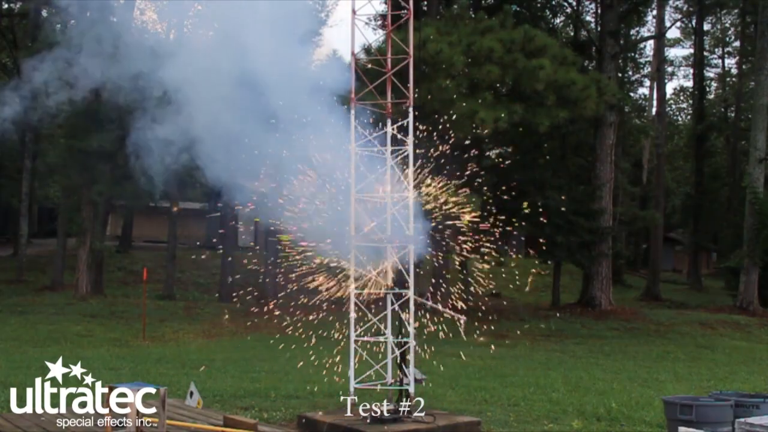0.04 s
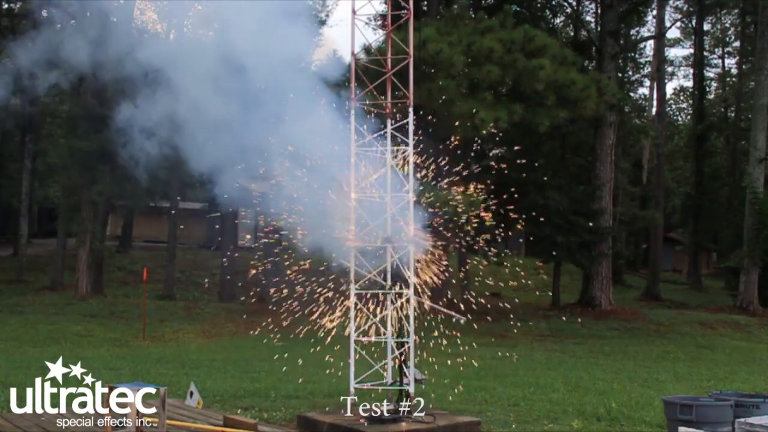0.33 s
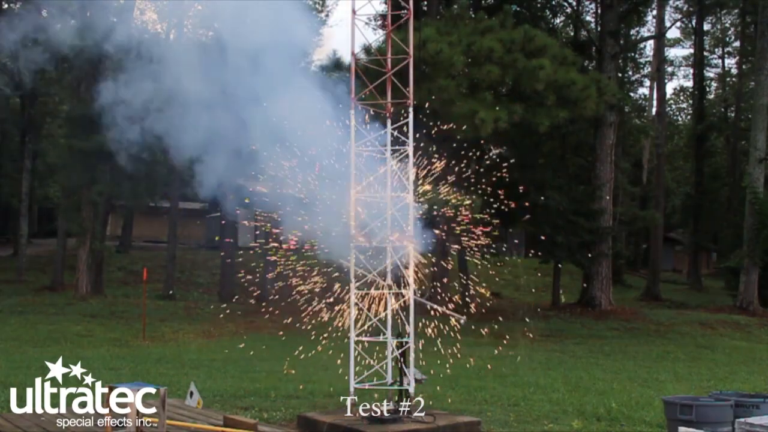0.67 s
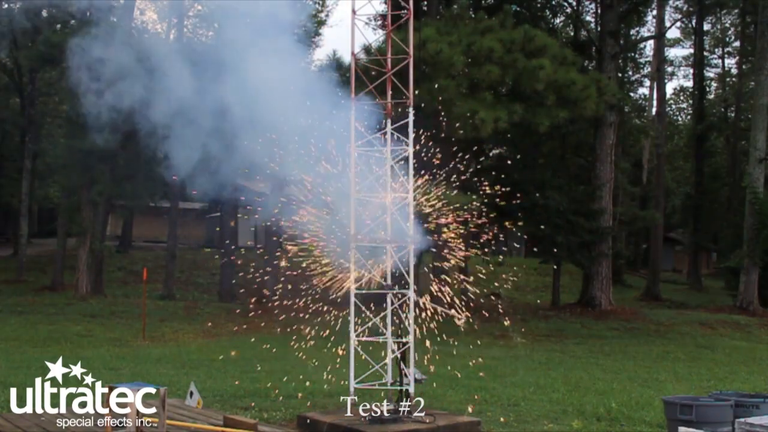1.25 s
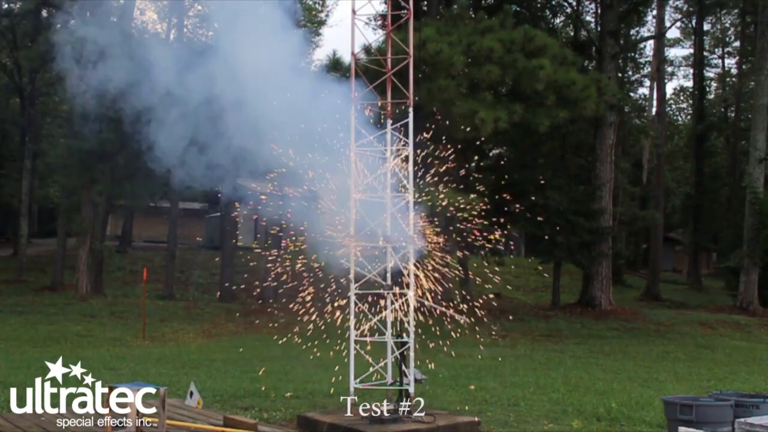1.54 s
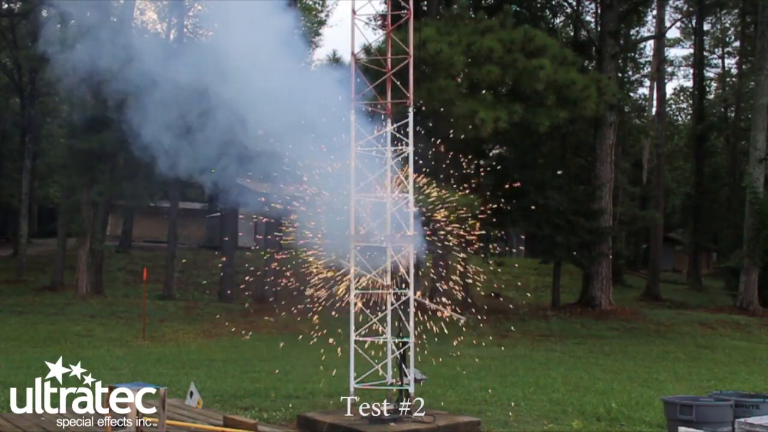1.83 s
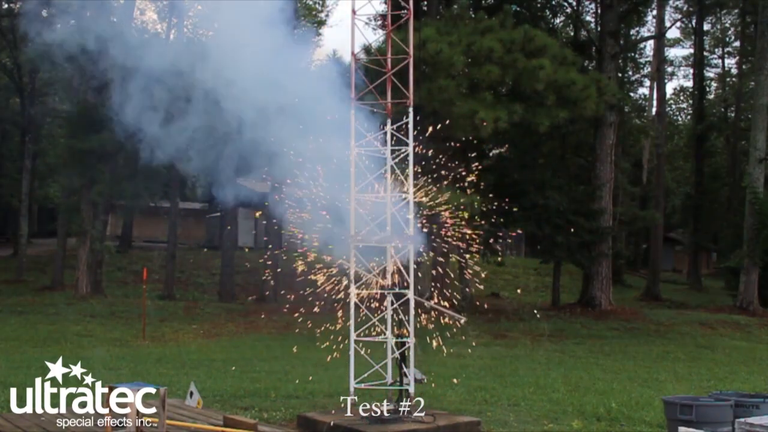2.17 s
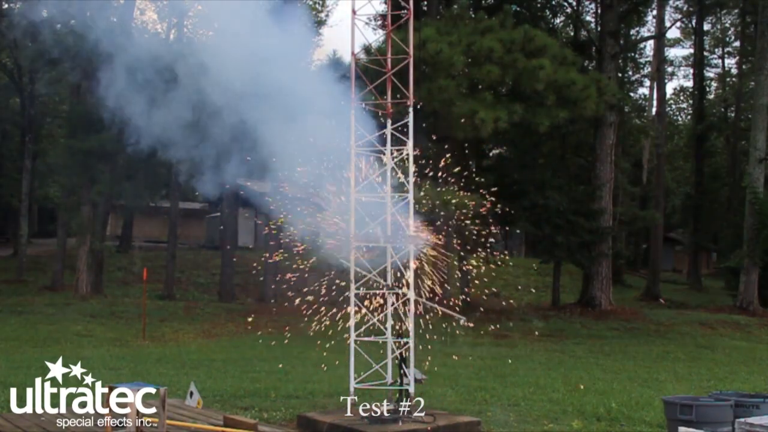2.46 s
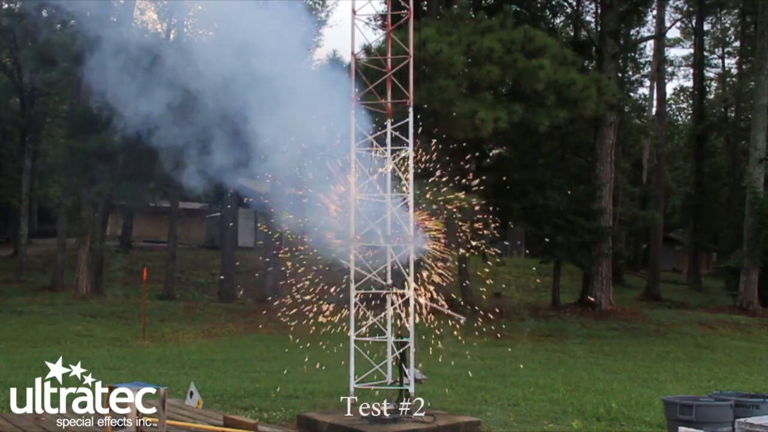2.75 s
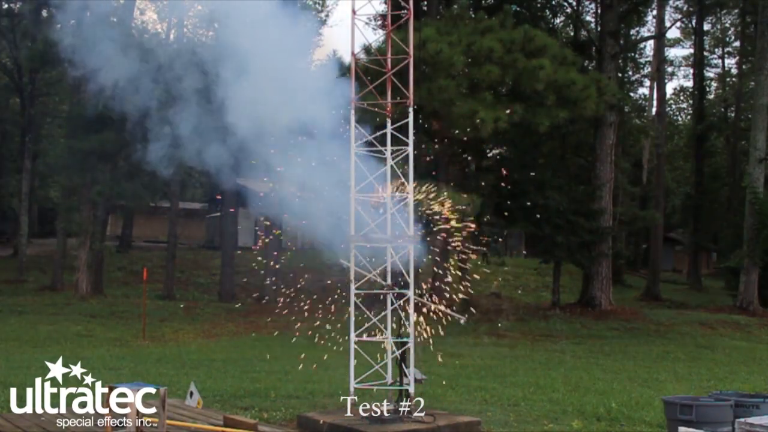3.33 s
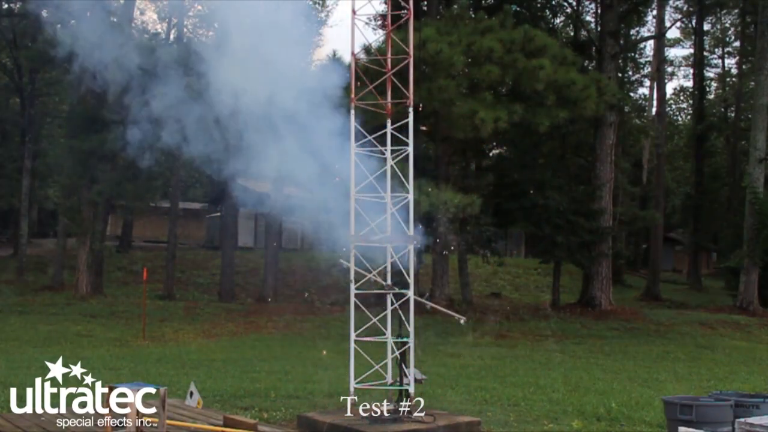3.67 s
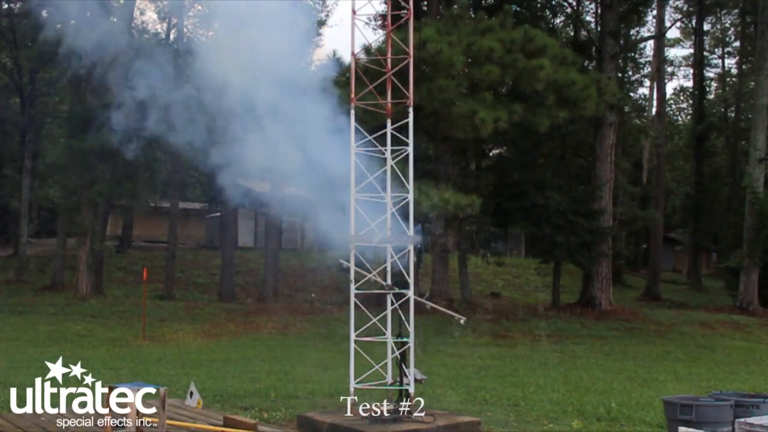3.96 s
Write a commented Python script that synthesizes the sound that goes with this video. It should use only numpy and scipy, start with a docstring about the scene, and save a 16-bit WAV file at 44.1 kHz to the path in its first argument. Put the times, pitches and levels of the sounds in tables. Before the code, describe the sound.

A firework wheel hisses loudly outdoors, fluttering and thick with crackling sparks and occasional sharp pops. Near the end the hiss drops away quickly, leaving a cluster of last pops and a faint, brief squeal.

```python
"""Firework wheel in a forest clearing

A wheel spins on a steel mast: its jets hiss and flutter, full of bursting sparks. Each pop comes
twice, direct and off the ground, and the trees scatter a faint tail. At 3.5 s the fuel runs out into
a few last pops. A thin squeal, probably the pivot, and a low hum like mains power are left."""
import sys
import numpy as np
from scipy import signal
from scipy.fft import rfft, irfft
from scipy.io import wavfile
from scipy.ndimage import map_coordinates

SR = 44100
rng = np.random.default_rng(int(sys.argv[2]) if len(sys.argv) > 2 else 0)


def master(y):
    """Save y as 16-bit WAV."""
    cut = np.clip(np.atleast_2d(y).T, -1, 1)
    pcm = np.round(cut * 32767)  # scale
    wavfile.write(sys.argv[1], SR, pcm.astype(np.int16))


N = 176400  # 4 seconds
T = np.arange(N) / SR

# How hard the jets push. Each row: time in seconds, level in dB.
THRUST = [(0.0, -18), (0.15, -19), (0.57, -21), (0.68, -18.5), (0.84, -20), (0.85, -18.5), (1.49, -20),
          (1.53, -17.5), (1.65, -21), (1.73, -18.5), (2.1, -20), (2.3, -19), (2.79, -21), (2.81, -18.5),
          (2.87, -20), (2.89, -17.5), (3.02, -21), (3.07, -18.5), (3.19, -19.5), (3.21, -21.5),
          (3.3, -19.5), (3.5, -23)]
# The push fading as the fuel runs out. Each row: time in seconds, level in dB.
DYING_THRUST = [(3.555, -28.5), (3.6, -35), (3.635, -36.5), (3.66, -31), (3.705, -41.5), (3.765, -41.5),
                (3.795, -51), (3.89, -49), (4.0, -52)]
# The tone of the jets. Each row: frequency in Hz, relative level in dB.
JET_TONE = [(35, -61), (60, -29), (111, -21), (181, -17.5), (295, -7.5), (393, -10.5), (479, -6.5),
            (624, -8), (870, -3.5), (1110, -5.5), (1270, -2), (2460, -2), (3660, 0.5), (9050, -3.5),
            (11000, -7.5), (11800, -10.5), (15300, -52), (22000, -120)]
# How long the trees echo. Each row: frequency in Hz, seconds to fade by 60 dB.
TREE_FADE = [(200, 0.7), (1500, 1.26), (4000, 0.65), (11000, 0.3)]
# The two notes of the hum. Each row: pitch in Hz, base level in dB.
HUM_NOTES = [(57, -68.5), (119.6, -58)]
# How the hum swells and sinks. Each row: time in seconds, dB added to the base level.
HUM_SWELL = [(0, -4), (2.1, -4.5), (2.35, 2), (2.6, -3), (3.15, -3), (3.35, 5), (3.65, -3.5), (4.0, 5)]
# The tone of the outdoor air. Each row: frequency in Hz, relative level in dB.
AIR_TONE = [(20, -15), (60, -4.5), (130, 0), (230, -1.5), (380, -6), (600, -4), (1200, -9.5), (3000, -8),
            (7000, -20), (12000, -30)]
# Loud single pops. Each row: start in seconds, relative level in dB.
LOUD_POPS = [(0.2666, -8), (0.7034, -7), (.9274, -3), (1.0426, -6), (2.167, -5), (2.3667, -6), (2.5377, 1),
             (2.8297, -14), (2.9635, -7), (2.983, -14), (3.3795, -1), (3.494, -2), (3.5487, -4),
             (3.5499, -4), (3.5576, -1.5), (3.5616, -5), (3.586, -6), (3.5919, -7), (3.6169, -11),
             (3.6262, -8), (3.642, -6), (3.6436, -13), (3.654, -4), (3.661, -9), (3.6673, -4),
             (3.6693, -11), (3.6797, -10), (3.6855, -6), (3.693, -6), (3.692, -5), (3.7137, -14),
             (3.7162, -15), (3.7213, -5), (3.731, -11), (3.7434, -11), (3.7569, -10), (3.758, -2.5),
             (3.7609, -3.5), (3.7634, -17), (3.7745, -10.5), (3.8082, -8.5), (3.879, -19), (3.8821, -9),
             (3.892, -22)]
# The tone of a pop. Each row: frequency in Hz, relative level in dB.
POP_TONE = [(50, -30), (150, -6), (300, -4.5), (550, -1), (1200, 0.5), (2500, -1.5), (5000, -2),
            (8000, -5.5), (11500, -11.5), (14000, -25)]
# The notes of the squeal. Each row: start and end in seconds, pitch in Hz, level at the end in dB.
SQUEAL_NOTES = [(3.765, 3.945, 3268, -46.5), (3.825, 3.95, 6270, -60)]

GROUND_LAG_S, GROUND_SWING_S = 0.0024, 0.000288  # the ground echo lags more as a jet swings up


def amp(db):
    """Turns decibels into a number to multiply by."""
    return 10 ** (np.asarray(db) / 20)


def unit(x):
    """Scales a signal to an average (rms) level of 1."""
    return x / np.sqrt(np.mean(x ** 2) + 1e-20)


def look_up(table, hz):
    """Reads between the rows of a frequency table, giving each octave equal room."""
    row_hz, value = np.transpose(table)
    return np.interp(np.log(hz + 1), np.log(row_hz + 1), value)


def colour(x, tone):
    """Filters a sound to follow a tone table; the filter rings only after a hit, never before."""
    hz = abs(np.fft.fftfreq(4096, 1 / SR))
    log_gain = np.log(amp(np.maximum(look_up(tone, hz), -100)))
    taps = np.fft.ifft(np.exp(np.conj(signal.hilbert(log_gain)))).real
    return signal.oaconvolve(x, taps[:len(taps) // 2])[:N]


def wander(fastest_hz, slowest_hz=6):
    """A random wobble of average size 1, mostly between two speeds."""
    hz = np.fft.rfftfreq(N, 1 / SR)
    shape = hz / (hz + slowest_hz) / np.sqrt((1 + hz / 10) * (1 + (hz / fastest_hz) ** 4))
    return unit(irfft(rfft(rng.standard_normal(N)) * shape, N))


def echoes(x, fade_seconds):
    """Many echoes blur into a tail that drops 60 dB in fade_seconds(hz)."""
    hz, t, bands = signal.stft(rng.standard_normal(SR), SR, nperseg=256)
    fade = amp(-60 * t / fade_seconds(hz)[:, None])
    tail = signal.istft(bands * fade, SR, nperseg=256)[1]
    return signal.fftconvolve(x, tail / np.linalg.norm(tail))[:N]


def gas(patch_hz=914, patch_s=0.022, patch_db=1.37):
    """Swirling gas hisses; its frequency bands flare and fade in short patches."""
    hz, t, bands = signal.stft(rng.standard_normal(N), SR, nperseg=256)
    random_grid = rng.standard_normal((200, 1000))
    places = np.meshgrid(hz / patch_hz, t / patch_s, indexing="ij")
    patches = unit(map_coordinates(random_grid, places, order=1, mode="wrap"))
    hiss = signal.istft(bands * amp(patch_db * patches), SR, nperseg=256)[1][:N]
    return unit(colour(hiss, JET_TONE))


def sparks(thrust_db, full_db=-19, full_per_s=2600, spread_db=3):
    """Thousands of tiny bursts a second, a few of them large; they thin out as the thrust drops."""
    sizes = amp(spread_db * np.minimum(rng.exponential(1, N), 3.86))
    share = amp(0.9 * (thrust_db - full_db))
    bursting = rng.random(N) < share * full_per_s / SR
    spikes = -sizes / np.sqrt(share) * bursting  # steady power here; wheel() sets the loudness
    return unit(colour(spikes, JET_TONE))


def wheel(turns_per_s=8.4, flutter_db=0.58, ground_gain=0.24):
    """Gas and sparks follow the fluttering thrust; the ground echo sweeps as the wheel turns."""
    thrust_db = np.interp(T, *np.transpose(list(THRUST) + list(DYING_THRUST)))
    thrust_db += flutter_db * wander(fastest_hz=44.5)
    jets = amp(thrust_db) * (amp(-2) * gas() + amp(-4) * sparks(thrust_db))
    lag_s = GROUND_LAG_S + GROUND_SWING_S * np.sin(2 * np.pi * turns_per_s * T)
    ground_echo = map_coordinates(jets, [np.arange(N) - lag_s * SR], order=3, mode="mirror")
    return jets + ground_gain * ground_echo


def trees(firework):
    """The trees scatter the sound back as a faint tail."""
    return amp(-16.5) * echoes(firework, lambda hz: look_up(TREE_FADE, hz))


def hum(waver_radians=0.55, flicker_db=2):
    """A low hum wavers in pitch and level."""
    notes = np.zeros(N)
    for hz, db in HUM_NOTES:
        phase = 2 * np.pi * hz * T + waver_radians * wander(fastest_hz=8)
        notes += amp(db) * unit(np.sin(phase))
    level_db = np.interp(T, *np.transpose(HUM_SWELL)) + flicker_db * wander(fastest_hz=12)
    return amp(level_db) * notes


def air():
    """The outdoor air makes a quiet, steady rush."""
    return amp(-47.5) * unit(colour(rng.standard_normal(N), AIR_TONE))


def pops(ground_gain=0.46, scatter_s=0.06):
    """Larger grains burst as sharp spikes, echo off the ground and scatter off the mast and lawn."""
    spikes = np.zeros(N)
    heights = rng.uniform(-1, 1, len(LOUD_POPS))  # from the bottom of the wheel to the top
    for (start, db), height in zip(LOUD_POPS, heights):
        echo_start = start + GROUND_LAG_S + GROUND_SWING_S * height
        spikes[round(start * SR)] -= amp(db)
        spikes[round(echo_start * SR)] -= ground_gain * amp(db)
    bangs = amp(7.5) * colour(spikes, POP_TONE)
    return bangs + amp(-7) * echoes(bangs, lambda hz: np.full(len(hz), scatter_s))


def squeal(rise_s=0.015, fall_s=0.012, growth_db_per_s=20):
    """Metal rings at two unrelated pitches that swell slowly and let go."""
    notes = np.zeros(N)
    for start, end, hz, db in SQUEAL_NOTES:
        swell = amp(db + growth_db_per_s * np.minimum(T - end, 0))
        fade_in = np.clip((T - start) / rise_s, 0, 1)
        fade_out = np.exp(-np.maximum(T - end, 0) / fall_s)
        notes += np.sqrt(2) * swell * fade_in * fade_out * np.sin(2 * np.pi * hz * T)
    return notes


def scene():
    """Everything is heard from straight ahead, alike in both channels."""
    firework = wheel() + pops()
    mono = firework + trees(firework) + hum() + air() + squeal()
    return np.array([mono, mono])


def record(dry, cutoff_hz=11990):
    """Cuts off the highest treble steeply."""
    low_pass = signal.firwin(601, cutoff_hz, window=("kaiser", 9), fs=SR)
    return signal.oaconvolve(dry, low_pass[None], "same")


dry = scene()
out = record(dry)
master(out)
```